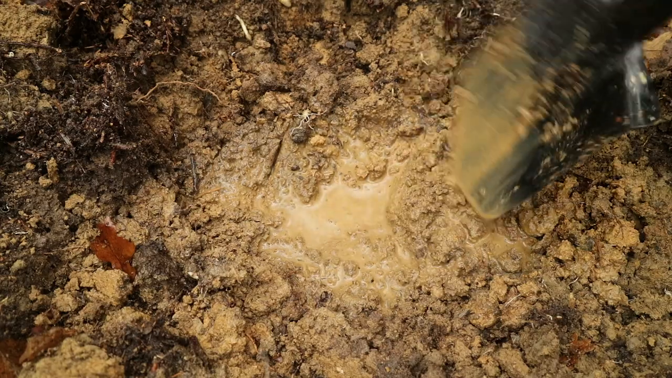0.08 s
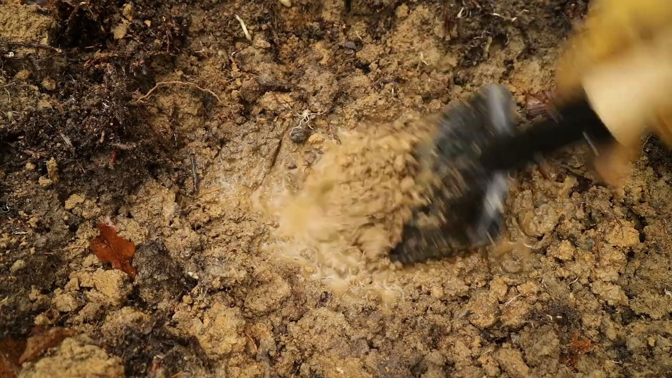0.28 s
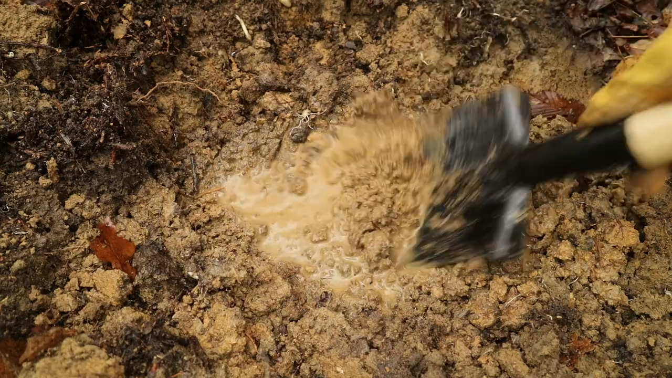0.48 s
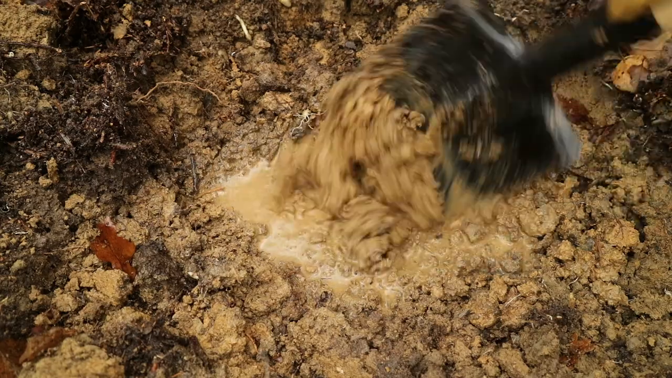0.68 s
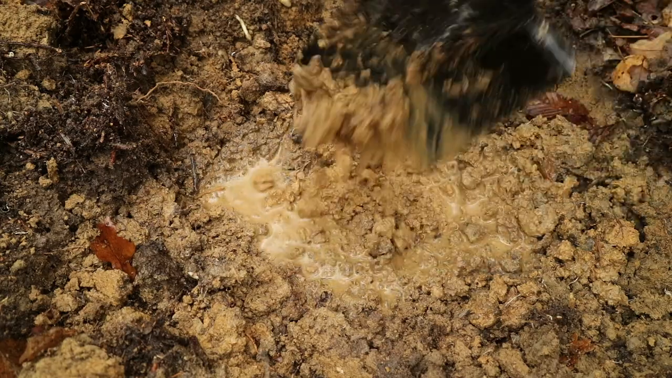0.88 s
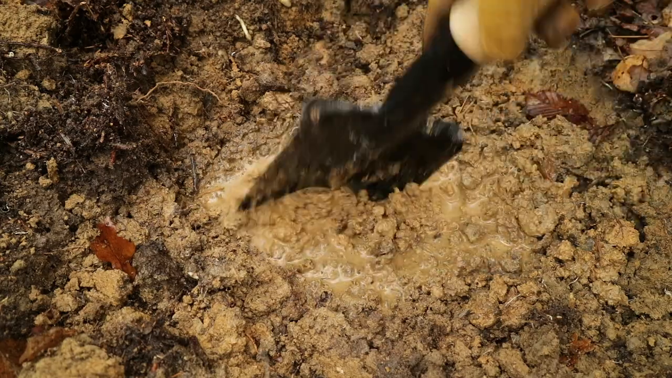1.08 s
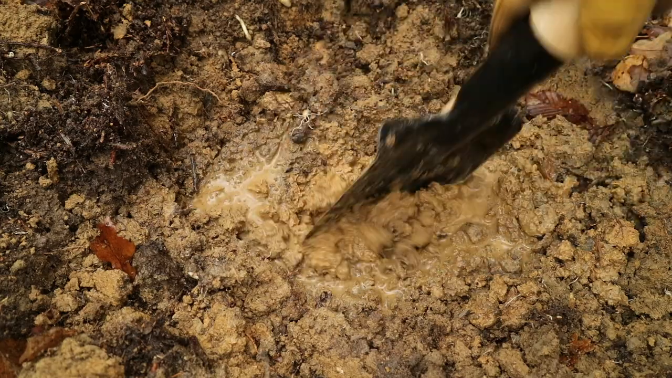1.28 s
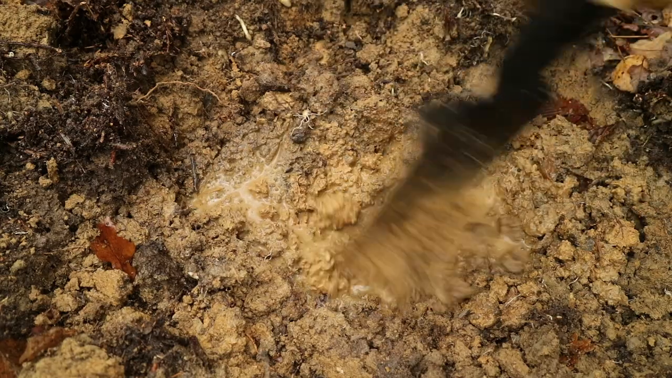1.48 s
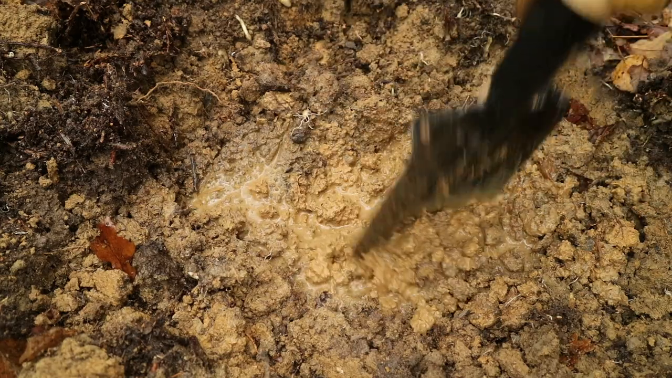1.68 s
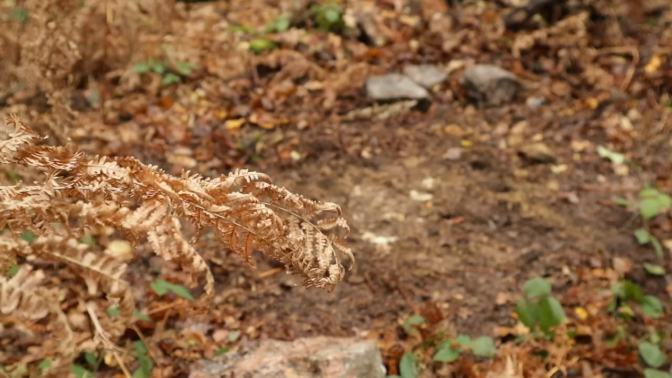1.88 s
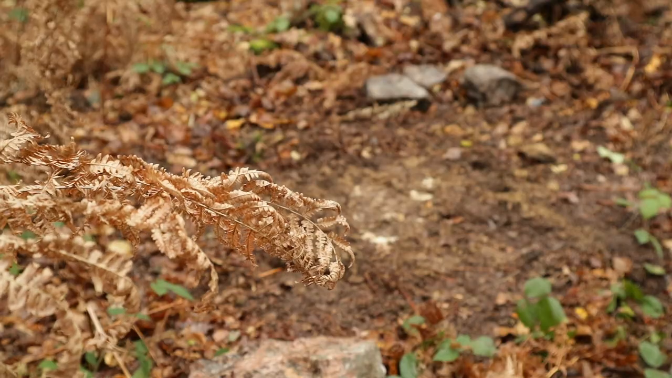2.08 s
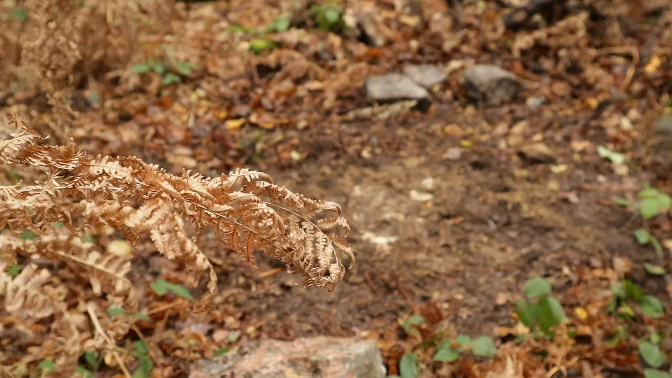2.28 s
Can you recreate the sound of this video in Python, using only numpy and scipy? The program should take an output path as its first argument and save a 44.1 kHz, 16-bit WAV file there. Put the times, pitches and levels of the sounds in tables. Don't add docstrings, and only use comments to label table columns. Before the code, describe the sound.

Shovel digging in wet clay: one hard gritty crack, squelchy pops, light stirring scrapes, leaves rustling

```python
import sys
import numpy as np
from scipy import signal
from scipy.fft import rfft, irfft
from scipy.io import wavfile
from scipy.ndimage import uniform_filter1d

SR = 44100
rng = np.random.default_rng(int(sys.argv[2]) if len(sys.argv) > 2 else 0)


def volts_from_decibels(level):
    exponent = np.asarray(level, float) / 20
    return 10 ** exponent


def store_wav(level_fs):
    pcm = np.round(np.clip(np.atleast_2d(level_fs), -1, 1) * 32767)
    wavfile.write(sys.argv[1], SR, pcm.T.astype(np.int16))


N = 101430


def evened(x):
    return x / np.sqrt(np.mean(x ** 2) + 1e-20)


def read(points, hz):
    f, value = np.transpose(points)[:2]
    return np.interp(np.log(hz + 1), np.log(f + 1), value)


def add(mix, s, sound):
    part = mix[max(round(s * SR), 0):][:len(sound)]
    part += sound[:len(part)]


def coloured(x, points):
    return evened(irfft(rfft(x) * volts_from_decibels(read(points, np.fft.rfftfreq(N, 1 / SR))), N))


def ringing(x, peaks):
    out = np.zeros(N)
    for k, (hz, width, db) in enumerate(peaks):
        r = np.exp(-np.pi * width / SR)
        resonator = [1, -2 * r * np.cos(2 * np.pi * hz / SR), r * r]
        out += (-1) ** k * volts_from_decibels(db) * (1 - r) * signal.lfilter([1, -r], resonator, x)
    return evened(out)


def grit(per_s, spread_db, lo_hz, hi_hz, cycles, count=24):
    size = volts_from_decibels(spread_db * np.minimum(rng.exponential(1, N), 3)) * (rng.random(N) < per_s / SR)
    kind = rng.integers(0, count, N)
    out = np.zeros(N)
    for k, hz in enumerate(np.geomspace(lo_hz, hi_hz, count)):
        u = np.arange(0, 6 * cycles, hz / SR) / cycles
        grain = u * np.exp(-2 * u) * np.sin(2 * np.pi * (cycles * u + rng.random()))
        grain *= np.sqrt(hz) / np.linalg.norm(grain)
        out += signal.oaconvolve(size * (kind == k), grain)[:N]
    return evened(out)


# (f/Hz, level/dB per Hz)
RUSTLE_TONE = [(30, -9), (127, -3), (950, 0.5), (1760, -2), (8340, -13.5), (16000, -22)]
# (t/s, level/dB, extra treble level/dB)
RUSTLE_SWELL = [(0, -51, 4.5), (.19, -52, 5), (.42, -54.5, -1), (.49, -57.5, -1.5), (.6, -56, 1.5),
                (.69, -58, 2.5), (.9, -55.5, 7.5), (1.04, -56.5, 4), (1.3, -51, 2), (1.8, -51, 5.5),
                (2.12, -48, 0), (2.21, -51, -0.5)]
# (f/Hz, side against middle level/dB)
SIDE_AIR = [(60, -29), (240, -7.5), (3770, -28), (15000, -17.5)]


def rustle():
    frames, hz = N // 128 + 5, np.fft.rfftfreq(512, 1 / SR)
    a, b, c, d, patches = rng.standard_normal((frames, 257, 5)).T
    patches = uniform_filter1d(patches, size=14, axis=0)
    patches = evened(uniform_filter1d(patches, size=8, axis=1))
    flicker = evened(uniform_filter1d(rng.standard_normal(frames), size=4))
    s, level_db, treble_db = np.transpose(RUSTLE_SWELL)
    t = np.arange(frames) * 128 / SR
    treble_share = np.clip(np.log2(hz / 2500 + 1e-9), 0, 2)[:, None] / 2
    tilt_db = np.interp(t, s, treble_db) * treble_share
    tilt_db += 0.37 * (np.interp(t, s, level_db) - np.mean(level_db)) * (hz < 350)[:, None]
    z = np.array([a + 1j * b, (c + 1j * d) * volts_from_decibels(read(SIDE_AIR, hz))[:, None]])
    z *= volts_from_decibels(read(RUSTLE_TONE, hz)[:, None] + 2.0 * patches + 2.5 * flicker + tilt_db)
    mid, side = signal.istft(z, nperseg=512, noverlap=384)[1][:, :N]
    scale = volts_from_decibels(np.interp(np.arange(N) / SR, s, level_db) - 1.0) / np.std(mid)
    drips = coloured(grit(900, 4.0, 400, 12000, cycles=2.5), RUSTLE_TONE)
    return scale * (mid + volts_from_decibels(-9) * np.std(mid) * drips + side * np.array([[1], [-1]]))


# (t/s, peak level/dB, f/Hz, snap
# against ring level/dB)
POPS = [(0.007, -33, 1240, -12), (0.513, -35, 1750, -12), (0.57, -38.5, 1960, -30.5),
        (0.627, -40.5, 680, -27), (0.653, -41.5, 1030, -10), (0.719, -23, 1870, -13),
        (0.729, -32, 1890, -16), (0.749, -33.5, 1590, -23), (0.763, -36, 1810, -11),
        (0.778, -28.5, 1940, -14), (0.812, -37, 1660, -22),
        (0.844, -38, 3160, -14), (0.849, -33.5, 3200, -29), (0.862, -40.5, 7560, -6.5),
         (1.011, -36, 710, -10), (1.056, -20, 1930, -7), (1.0705, -14, 2980, -13.5),
         (1.168, -30, 6500, -26), (1.178, -34, 4460, -20), (1.549, -37, 1640, 6), (1.731, -26.5, 8400, -19),
         (1.761, -29.5, 6200, -14), (1.791, -31.5, 6340, -7), (1.83, -39, 1695, -4),
         (2.13, -39.5, 1120, -5)]
# (t/s, peak level/dB, f/Hz, snap against ring level/dB)
DRIPS = [
    (0.159, -38, 5000, -45),
    (0.654, -35.5, 3570, -25),
    (0.7194, -34.5, 630, -39),
    (.719, -28, 4760, -42),
    (0.7792, -30.5, 6350, -40),
    (1.07, -29, 800, -43),
    (1.211, -31, 7250, -27),
    (1.730, -30, 1430, -40),
]
# (multiple of its pitch, level/dB)
OVERTONES = [(2.45, -9.5), (4.2, -18)]
POP_CYCLES, POP_GLIDE = 1.29, 0.025
SNAP_FALL_S, SNAP_RISE_S, POP_LAG_S = 0.0011, 0.00021, 0.002


def pops():
    out, rows = np.zeros(N), POPS + DRIPS
    t = np.arange(900) / SR
    snap_t = t[:300]
    snap_shape = np.minimum(snap_t / SNAP_RISE_S, 1) * np.exp(-snap_t / SNAP_FALL_S)
    chance = rng.standard_normal((len(rows), 300))
    for (s, db, hz, snap_db), noise in zip(rows, chance):
        u = t * np.sqrt(hz * 1800) / POP_CYCLES
        turn = 2 * np.pi * hz * t * (1 + POP_GLIDE * np.minimum(u, 3) / 3 - POP_GLIDE / 3)
        ring = np.sin(turn)
        for multiple, over_db in OVERTONES:
            if multiple * hz < 15000:
                ring += volts_from_decibels(over_db) * np.sin(multiple * turn + noise[0])
        pop = ring * (1 - np.exp(-3 * u)) * np.exp(-u)
        pop[:300] += volts_from_decibels(snap_db) * uniform_filter1d(noise, size=2) * snap_shape
        add(out, s + POP_LAG_S, volts_from_decibels(db + 7) * pop)
    return signal.lfilter(*signal.butter(3, 330, "high", fs=SR), out)


def mottled(x, patchy_db):
    z = signal.stft(x, nperseg=256)[2]
    patches = rng.standard_normal(z.shape[::-1]).T
    patches = uniform_filter1d(patches, size=7, axis=0)
    patches = evened(uniform_filter1d(patches, size=7, axis=1))
    return evened(signal.istft(z * volts_from_decibels(patchy_db * patches), nperseg=256)[1][:N])


# (t/s, length/s, crunch level/dB, share spent rising 0-1, steel hiss against crunch level/dB)
STROKES = [(0.182, 0.027, -53.5, 0.67, 1.5), (0.206, 0.04, -39.5, 0.06, 7.5), (0.235, 0.029, -44.5, 1, 3.5),
           (0.262, 0.037, -36, 0.1, 3.5), (0.279, 0.042, -33, 0, -1), (0.2963, 0.018, -23.5, 0.3, -2),
           (0.308, 0.029, -35.5, 0.38, -14.5), (0.351, 0.091, -56, 0.03, -1),
           (0.528, 0.01, -30, 0.33, -12.5), (0.535, 0.054, -45.5, 0, -13), (0.72, 0.017, -36.5, 0.02, -10),
           (0.735, 0.096, -48.5, 0.6, -7), (1.055, 0.023, -51.5, 0.24, 11.5), (1.076, 0.029, -39, 0.62, -5),
           (1.1, 0.077, -39.5, 0.09, 1), (1.172, 0.29, -50, 0.38, 1.5), (1.342, 0.046, -42, 0.6, -5.5),
           (1.432, 0.044, -49, 0.35, 2), (1.473, 0.072, -50, 0.57, 1), (1.54, 0.14, -46.5, 0.35, 3),
           (1.559, 0.023, -47, .45, 2), (1.689, 0.13, -48, 0.11, 1), (2.24, 0.023, -47, 0.06, -1),
           (2.275, 0.036, -56.5, 0.43, -2)]
# (f/Hz, level/dB per Hz)
CRUNCH_TONE = [(200, -25), (450, 3.5), (1050, 4.5), (2500, 0), (3600, -2.5), (7000, -16), (15000, -68)]
# (f/Hz, width/Hz, level/dB)
BLADE_BENDS = [(1210, 160, 6), (2080, 750, -28.5), (3350, 1900, 40)]
# (f/Hz, width/Hz, level/dB)
MUD_HOLLOWS = [(477, 180, -2), (2000, 280, 9), (3080, 900, -1)]
# (f/Hz, level/dB per Hz)
HISS_TONE = [(2650, -12), (4500, -9), (7650, -7), (10000, -19.5), (13700, -11.5), (16000, -27.5)]
# (f/Hz, width/Hz, level/dB)
STEEL_RING = [(8400, 680, 0)]
LIFT_START_S, LIFT_END_S = 0.5, 1.0


def strokes():
    push, slide = np.zeros(N), np.zeros(N)
    for start, length, db, rise, steel_db in STROKES:
        u, rise = np.arange(0, 1, 1 / (length * SR)), np.clip(rise, .02, .9)
        shape = np.sin(np.pi / 2 * np.minimum(u / rise, (1 - u) / (1 - rise))) ** 0.96
        add(push, start, volts_from_decibels(db) * shape)
        add(slide, start, volts_from_decibels(db + steel_db) * shape)
    coarse = grit(3500, 4.0, 300, 6500, cycles=1.5) + rng.standard_normal(N)
    fine = grit(4000, 6.9, 4350, 22400, cycles=0.55) + volts_from_decibels(1) * rng.standard_normal(N)
    t = np.arange(N) / SR
    body = coloured(coarse, CRUNCH_TONE)
    bend_db = np.where(t < LIFT_START_S, -2.5, -8)
    crunch = body + volts_from_decibels(bend_db) * ringing(body, BLADE_BENDS)
    squelch = evened(volts_from_decibels(-6.5) * body + ringing(body, MUD_HOLLOWS))
    hiss = coloured(fine, HISS_TONE) + volts_from_decibels(-8.5) * ringing(fine, STEEL_RING)
    hiss = mottled(hiss, patchy_db=2.5)
    waver = uniform_filter1d(uniform_filter1d(rng.standard_normal(N), size=70), size=50)
    slip = evened(volts_from_decibels(2.03 * evened(waver)))
    lifted = (t > LIFT_START_S) & (t < LIFT_END_S)
    return slip * (push * np.where(lifted, squelch, crunch) + slide * hiss)


# (t/s, peak level/dB, f/Hz,
# decay/ms)
CRACKS_AND_KNOCKS = [(0.2095, -31, 1070, 2.3), (.213, -22, 3600, 2.8), (.221, -21.5, 3020, 2.4),
                     (.224, -25, 2240, 4.3), (.227, -25, 7600, 1.5), (0.2454, -24, 7500, 1.3), (0.253, -22, 3070, 1.7),
                     (.264, -25, 7040, 1.2), (0.2667, -18, 3400, 0.91), (0.267, -16.5, 1340, 2.04),
                     (0.271, -17, 1400, 1.3), (0.2863, -3, 1950, .5), (0.289, -17.5, 1290, 1.6),
                     (.2935, -11, 850, 1.3), (.2972, 0, 3080, 1.1), (0.297, -11.5, 7700, 0.96), (.3, -6.5, 2190, 0.91),
                     (0.3022, -12.5, 1150, 2.9), (0.3024, -2, 3140, 1.03), (0.3024, -14, 8030, 1.36),
                     (0.3028, -16.5, 6520, 1.4), (0.3062, -6, 2215, 1.6), (0.3062, -3.5, 2770, 1.53),
                     (0.3076, -10.5, 1178, 2), (.3105, -4.5, 2000, 0.77), (0.311, -18, 3780, 1.5),
                     (.316, -15, 1290, 0.9), (.322, -20.5, 1183, 2.8), (0.329, -34.5, 2500, 1), (.338, -26, 1300, 0.9),
                     (.398, -36, 1660, 1.3), (.448, -36.5, 1420, 0.39), (.474, -46, 806, 1.5), (.663, -40, 1100, .5),
          (.637, -36, 1700, 0.45), (0.7194, -27, 3710, 1.2), (.5282, -19.5, 1910, 1.7),
          (.5282, -36, 3580, 1.1), (.532, -24, 560, 1.9), (.5325, -22, 2680, 1.15), (.535, -32, 4030, 1.3),
          (0.5341, -33.5, 380, 3), (.881, -46, 1610, 1.2), (.902, -35, 5960, .12),
          (.91, -37.5, 10000, 0.33), (.953, -39.5, 12000, 0.72), (.988, -48, 2300, 1.2),
          (1.022, -43, 1500, 1.7), (1.034, -41, 4500, .8), (1.0775, -25, 1860, 1.3),
          (1.0915, -21.5, 5050, 0.86), (1.094, -27, 2870, 1.7), (1.108, -27, 6160, .9),
          (1.118, -47, 1510, 0.79), (1.121, -24, 2000, 1.5), (1.128, -33, 8000, 3.5),
          (1.148, -29, 7800, 1.1), (1.2872, -17, 3560, 1.3), (1.2872, -21.5, 2530, 1.27),
          (1.2872, -22, 1445, 1.46), (1.2872, -22.5, 5630, 0.7), (1.292, -39, 3850, .9),
          (1.31, -29, 2260, 0.81), (1.3385, -36, 11300, .5), (1.361, -29.5, 1080, 2.7),
          (1.517, -31.5, 7500, 1.7), (1.57, -42, 1020, 2), (2.2449, -28, 3350, .8), (2.245, -30, 1560, 1.5),
          (2.246, -33, 910, 4), (2.246, -35, 510, 3.9), (2.2555, -35, 935, 3.1), (2.2555, -44, 4900, 1.2)]
RING_RISE_S = 0.00021


def cracks_and_knocks():
    out, t = np.zeros(N), np.arange(1500) / SR
    rise = 1 - np.exp(-t / RING_RISE_S)
    for s, db, hz, decay_ms in CRACKS_AND_KNOCKS:
        fall = np.exp(-1000 * t / decay_ms)
        add(out, s, volts_from_decibels(db + 2) * rise * fall * np.sin(2 * np.pi * hz * t))
    return signal.lfilter(*signal.butter(2, 260, "high", fs=SR), out)


# (t/s, level/dB, f/Hz, rise/s)
THUDS = [
    (0.293, -32, 125.8, 0.0077),
    (0.298, -28, 326.6, 0.0082),
    (1.107, -42.5, 289, 0.0093),
    (1.11, -52.5, 148, 0.02),
    (1.343, -49, 155, 0.017),
    (1.557, -52, 220.4, 0.051),
]
THUD_FALL = 1.23


def thuds():
    out, wander = np.zeros(N), np.cumsum(rng.standard_normal((len(THUDS), SR // 2)), 1)
    for (s, db, hz, rise), drift in zip(THUDS, wander):
        t = np.arange(0, 6 * rise, 1 / SR)[:SR // 2]
        turn = 2 * np.pi * hz * t + 0.098 * uniform_filter1d(drift, size=60)[:len(t)]
        swell = (t / rise * np.exp(1 - t / rise)) ** THUD_FALL
        add(out, s, volts_from_decibels(db) * swell * np.sin(turn))
    return out


def scene():
    near = strokes() + pops() + cracks_and_knocks() + thuds()
    t = np.arange(1500) / SR
    walls = rng.standard_normal((2, 1500)) * np.exp(-t / 0.0044) * (t > .001)
    walls /= np.linalg.norm(walls[0])
    mid, side = signal.fftconvolve(near[None], walls, axes=1)[:, :N]
    scatter = volts_from_decibels(-15) * mid + volts_from_decibels(-35) * side * np.array([[1], [-1]])
    return near + scatter + rustle()


def roll_off(x):
    return signal.sosfilt(signal.butter(12, 16650, fs=SR, output="sos"), x)


def record(dry):
    x = signal.lfilter(*signal.butter(2, 70, "high", fs=SR), dry)
    rounded = np.sign(x) * (.6 + .25 * np.tanh((abs(x) - .6) / .25))
    x = np.where(abs(x) > .6, rounded, x)
    band_limit = signal.firwin(255, 15900, window=("kaiser", 9), fs=SR)
    x = signal.oaconvolve(x, band_limit[None], "same")
    return roll_off(x)


dry = scene()
out = record(dry)
store_wav(out)
```